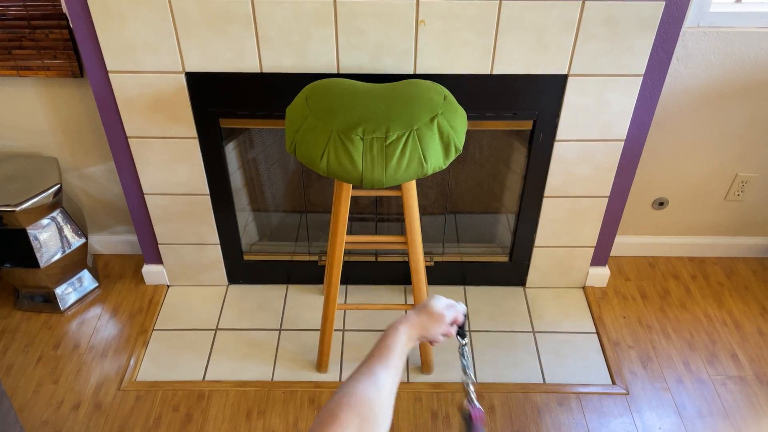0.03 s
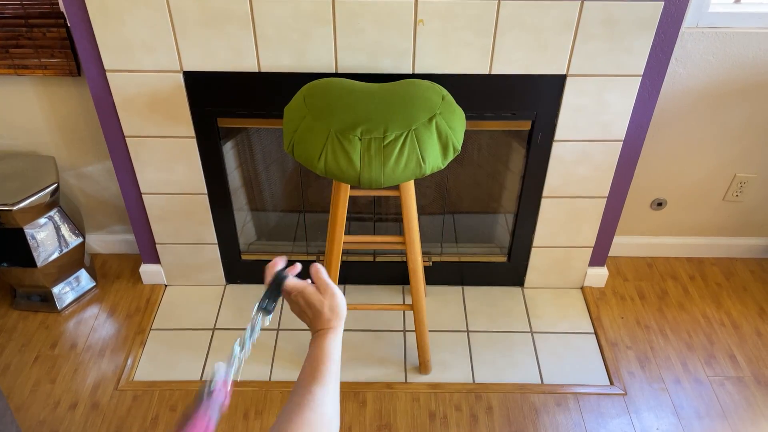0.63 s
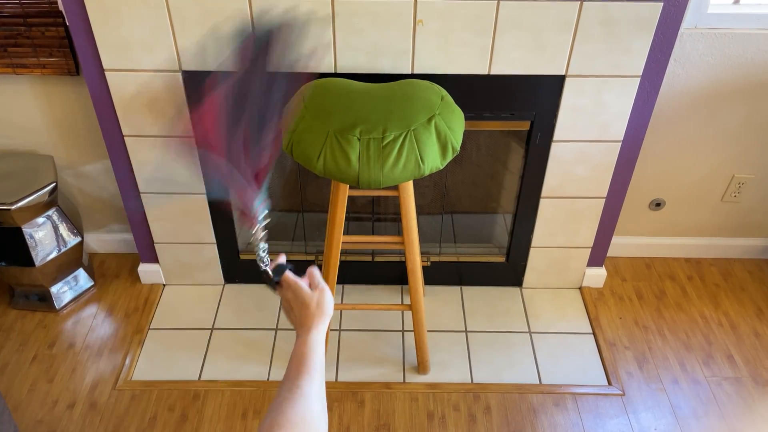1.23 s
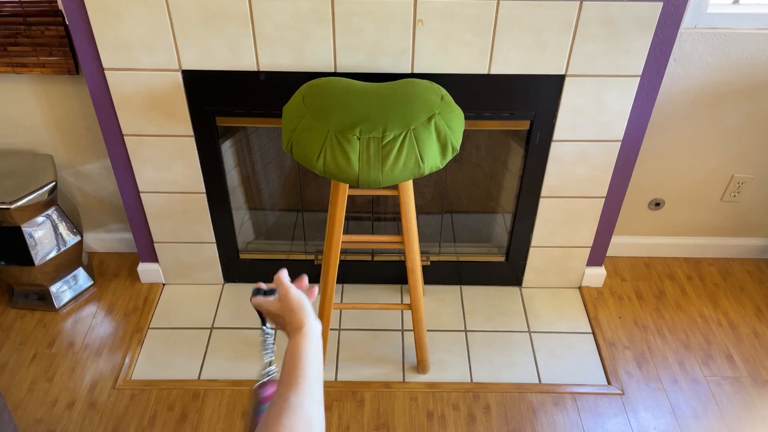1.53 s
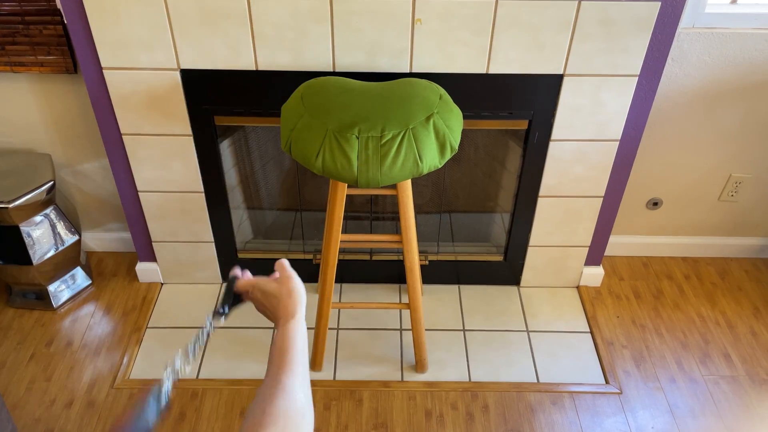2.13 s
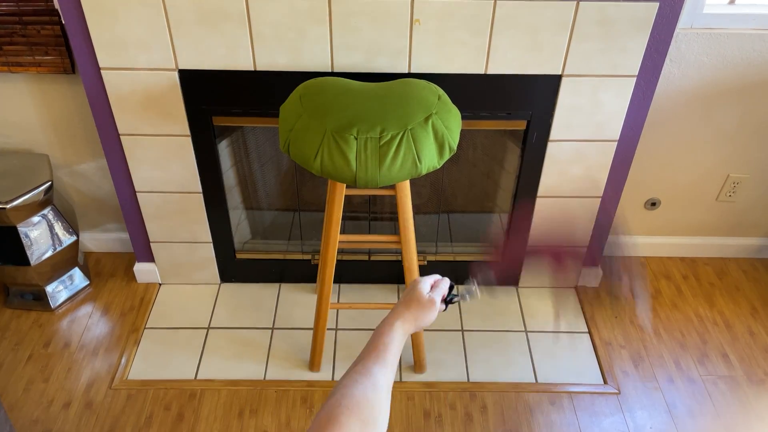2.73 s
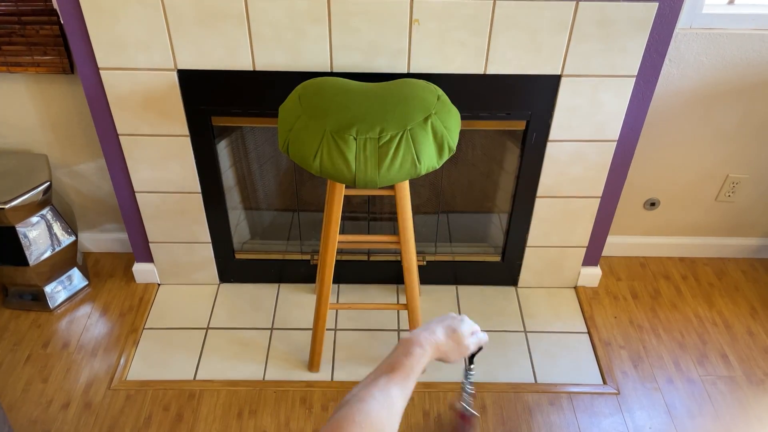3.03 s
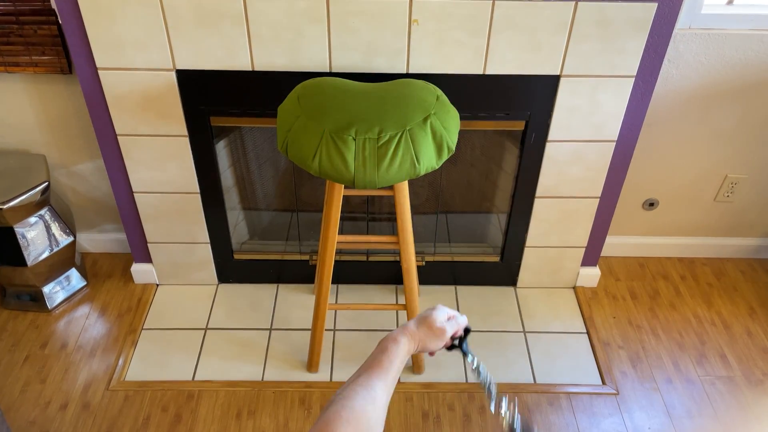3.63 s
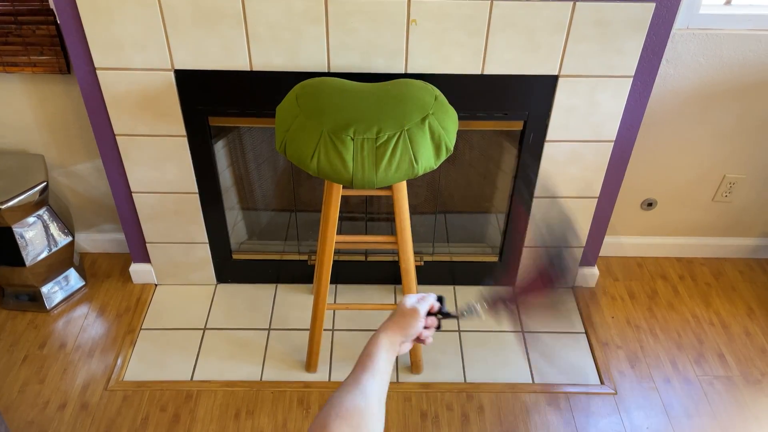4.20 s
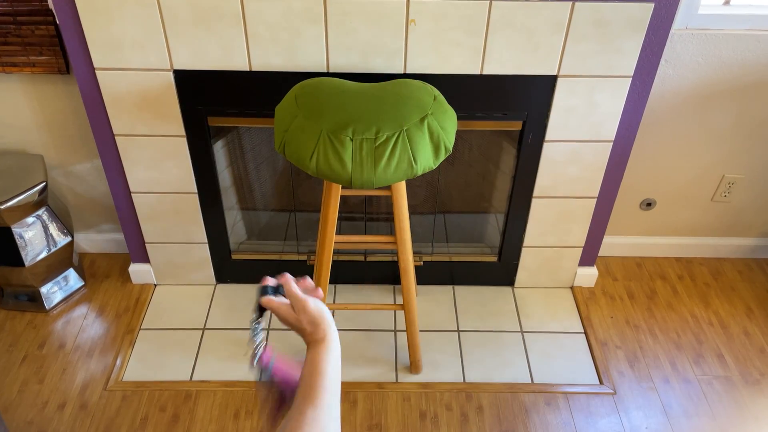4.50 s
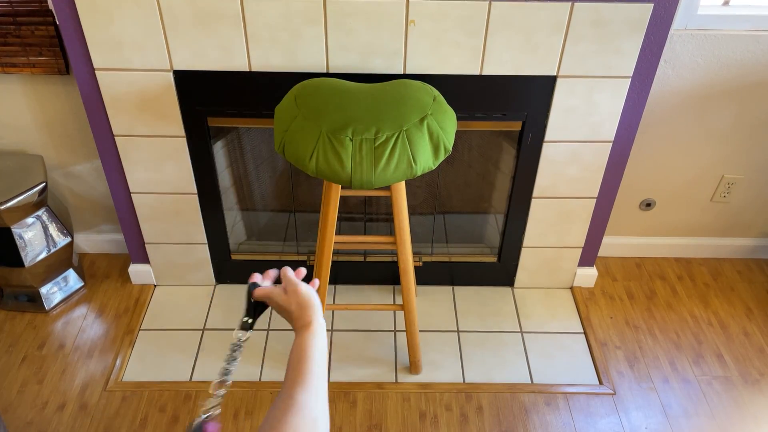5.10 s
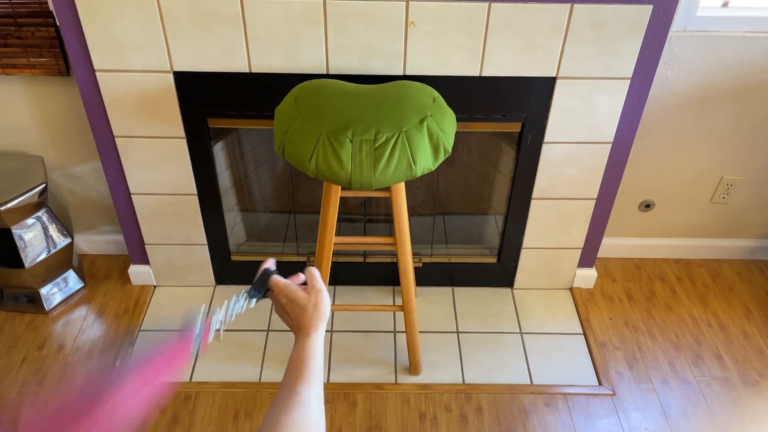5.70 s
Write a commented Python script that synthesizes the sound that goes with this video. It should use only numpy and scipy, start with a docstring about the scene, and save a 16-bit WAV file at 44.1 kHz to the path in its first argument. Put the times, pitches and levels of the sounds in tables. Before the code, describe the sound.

A many-tailed leather flogger strikes a padded stool about twice a second in a live, tiled room. Each stroke is a splashy slap with a soft cushion thud, some topped by a sharp crack from a single tip. Between strokes the loose tails flop and tick together, and the handle's metal link occasionally gives a small clink close to the microphone. A quiet low rumble lies behind.

```python
"""A live tiled room, heard through two closely spaced microphone ports. A many-tailed leather flogger
swings in figures of eight onto a padded stool, twice a second. Each stroke is a shower of tails with a
thud of the cushion, and single tips snap. Between strokes the tails flop together, and now and then the
handle's metal link clinks close to the microphone. A low rumble lies behind, with a faint hum late on."""
import sys
import numpy as np
from scipy import signal
from scipy.fft import rfft, irfft, next_fast_len
from scipy.io import wavfile
from scipy.ndimage import map_coordinates

SR = 44100
rng = np.random.default_rng(int(sys.argv[2]) if len(sys.argv) > 2 else 0)


def store_wav(level_fs):
    """Save 16-bit WAV to argv[1]."""
    pcm = np.round(np.clip(np.atleast_2d(level_fs), -1, 1) * 32767)
    wavfile.write(sys.argv[1], SR, pcm.T.astype(np.int16))


N = 262395
SPAN = 8192  # samples in one short sound, and in a track's run-up before time zero

# strokes on the seat: thickest_landing_s, lead_in_s, slap_db, pitch_factor, weight_db, air_pop_db
SEAT_STROKES = [(-.06, .014, -33, 1.02, -36.5, -40), (.448, .013, -22.5, 1.3, -26.5, -39),
                (.951, 0.011, -30, 1.05, -32.5, -40), (1.452, .028, -28, 1.11, -36, -36.5),
                (1.973, 0.03, -36, 1.02, -42, -51), (2.487, .013, -25.5, 1.04, -31, -37),
                (2.974, 0.012, -34.5, 1.04, -43.5, -45), (3.453, 0.0054, -31.5, 1.08, -40, -44),
                (3.951, .002, -34.5, 0.96, -36, -28.5), (4.456, .018, -26.5, .92, -30.5, -35),
                (4.973, .013, -32, 1.03, -34, -30), (5.481, .021, -28.5, 0.99, -35, -48)]
# single tips cracking or tapping: start_s, level_db, sizzle_db
TIP_SNAPS = [(0.4481, -8.5, -24.5), (.689, -30, -42), (.801, -41.5, -49), (.917, -38, -60),
             (0.9486, -18.5, -48), (1.04, -30, -28), (1.109, -32.5, -52), (1.177, -44, -47),
             (1.458, -16.5, -15.5), (1.697, -34, -54), (1.722, -20, -52), (2.195, -42, -54),
             (2.4879, -12.5, -20.5), (2.6393, -27, -54), (2.742, -30, -35), (2.9704, -20.5, -43),
             (3.456, -24.5, -34), (3.9498, -30.5, -29.5), (4.4536, -16.5, -21), (4.7092, -38, -65),
             (4.87, -39, -50), (5.2037, -32.5, -64)]
# loose tails flopping together: peak_s, fall_s, level_db, pitch_factor
TAIL_FLOPS = [(0.145, 0.098, -52.5, 0.78), (0.264, 0.077, -56, 0.74), (.695, .07, -48, 0.95),
              (1.118, .06, -47.5, 1.2), (1.181, 0.057, -42.5, 1.07), (1.727, 0.086, -39.5, 0.82),
              (1.925, 0.066, -49, 0.9), (2.022, .11, -40, 0.65), (2.203, 0.077, -48, 1.13),
              (2.469, 0.059, -45.5, 0.9), (2.63, .2, -42, 1.24), (2.747, 0.091, -38.5, 0.96),
              (3.158, 0.067, -40.5, 0.9), (3.228, 0.087, -45, 1.07), (3.549, 0.055, -42.5, 0.87),
              (4.141, 0.054, -52.5, .84), (4.24, 0.032, -57, 0.96), (4.353, 0.041, -58, 0.55),
              (5.21, 0.078, -45, 0.9), (5.725, 0.15, -49.5, 1)]
# clinks of the handle's link: start_s, pitch_hz, level_db, swell_s, t60_s, waver_fraction
LINK_CLINKS = [(0.42, 4050, -53.5, 0.0023, 0.14, .03), (3.22, 3910, -43, 0.0069, 0.24, 0.03),
               (5.845, 2182, -40.5, 0.0096, 0.16, 0.0083)]
# the link's partials: pitch_multiple, level_db
LINK_PARTIALS = [(1, 9), (.93, -2), (1.98, -10), (2.95, -17)]
# the padded seat as a whole: pitch_hz, width_hz, level_db
CUSHION_MODES = [(98.4, 40, -31), (206.4, 44, 23)]
# the seat's taut cover: pitch_hz, width_hz, level_db
COVER_MODES = [(301, 17, -10), (391, 67, 4), (604, 130, -11.5)]
# air squeezed from under the tails: pitch_hz, width_hz, level_db
AIR_POCKET_MODES = [(570, 34, 0.5), (937, 133, -4), (1252, 93, -3)]
# one leather contact: frequency_hz, level_db
LEATHER_SPECTRUM = [(40, -35.5), (200, -2.5), (700, -4.5), (1400, -5.5), (1900, 3), (2600, 3.5), (3900, 1),
                    (5000, -3), (6000, -16.5), (7500, -10), (10000, -21.5), (16000, -42)]
# the treble sizzle of a contact: frequency_hz, level_db
SIZZLE_SPECTRUM = [(500, -30), (4000, -12), (7000, 0), (8800, -5), (10500, -2), (12500, -6), (15000, -6),
                   (17000, -10)]
# colour of the echoes: frequency_hz, gain_db
WALL_COLOUR = [(60, 9), (110, 11.5), (200, -4), (400, -4), (800, -4.5), (1800, 1), (3000, -2), (5000, -2.5),
               (7500, -5), (16000, -7.5)]
# how long the room rings: frequency_hz, t60_s
ROOM_DECAY = [(100, 0.57), (400, 0.44), (1000, 0.72), (2500, 0.63), (5000, 0.66), (10000, 0.63),
              (16000, 0.35)]
# room tone: frequency_hz, level_db
RUMBLE_SPECTRUM = [(20, -36), (35, -7.5), (55, 1.5), (110, 1.5), (170, -6), (380, -6.5), (600, -16.5),
                   (1200, -13.5), (2800, -30.5), (5000, -24.5), (8000, -31), (11000, -35), (16000, -70)]
# course of the faint hum: time_s, pitch_hz, level_db
HUM_COURSE = [(0, 365, -85), (5.22, 350, -63), (5.32, 358, -58.5), (5.45, 362, -55.5), (5.68, 368, -60),
              (5.78, 366, -55), (5.95, 352, -58)]
# likeness of scattered sound at the two ports: frequency_hz, coherence (0-1)
PORT_COHERENCE = [(100, .97), (450, .85), (1300, .1), (3000, .2), (5300, .2), (7000, .6), (8600, .97),
                  (10500, .85), (11600, .5), (12700, .97), (16000, .75)]
# the ports' phase mismatch: frequency_hz, left_lead_rad
PORT_PHASE = [(900, 0.37), (2200, 1.44), (3800, 0.46), (5600, 2), (7000, 0.62), (8600, 3), (10400, 7.5),
              (12700, 9), (14500, 8), (16000, 26)]
# balance of sound from the front: frequency_hz, left_minus_right_db
FRONT_BALANCE = [(100, -0.5), (900, -4), (1350, -1), (1800, -3.5), (2600, 7), (3600, 2.5), (5200, 10),
                 (6100, -9), (8000, -0.5), (16000, 0)]


def strokes(whoosh_s=0.00486, sink_s=0.013, yield_s=0.00317, usual_slap_db=-28.5, usual_weight_db=-36.5):
    """The bundle pushes air ahead of it, slaps the cover, sinks into the padding and slides off."""
    track = np.zeros(N + SPAN)
    sizzle, pocket = minimum_phase(SIZZLE_SPECTRUM), resonant(AIR_POCKET_MODES)
    cover, cushion = resonant(COVER_MODES), resonant(CUSHION_MODES)
    for peak_s, lead_s, slap_db, pitch, weight_db, pop_db in SEAT_STROKES:
        touch_s = peak_s - lead_s
        fall_s = 0.049 + 0.76 * lead_s  # a spread-out bundle both arrives and settles more slowly
        sizzle_db = -38 + 0.8 * (slap_db - usual_slap_db)
        air_db = -36.5 + 0.34 * (weight_db - usual_weight_db)
        leather = minimum_phase(LEATHER_SPECTRUM, pitch)
        shape = landing(lead_s, fall_s, first_db=-12)
        whoosh = shower(landing(whoosh_s, fall_s, first_db=-3), pocket)
        add(track, touch_s - whoosh_s, amp(air_db - 13.5) * whoosh)
        add(track, touch_s, amp(slap_db) * shower(shape, leather, per_s=5000, scatter_db=2.5))
        add(track, touch_s, amp(sizzle_db) * shower(shape, sizzle))
        # trapped air pops at the first contact and is squeezed out as the rest lands
        add(track, touch_s, amp(pop_db) * blow(pocket, energy_s=0.0014))
        add(track, touch_s, amp(air_db) * shower(landing(lead_s, 0.61 * fall_s, first_db=-5.5), pocket))
        # single tails drum on the cover, the whole bundle knocks it, then the padding gives way
        add(track, touch_s, amp(weight_db - 2) * shower(shape, cover))
        loaded_s = max(peak_s, touch_s + sink_s)
        add(track, loaded_s, amp(weight_db + 0.5) * blow(cover, energy_s=0.0022))
        add(track, loaded_s + yield_s, amp(weight_db - 2) * blow(cushion, energy_s=0.0055))
        slide = shower(landing(lead_s=0.052, fall_s=0.15, first_db=-13), leather, per_s=450, scatter_db=1)
        add(track, peak_s, amp(-48) * slide)
    return track


def snaps(decay_s=0.00066):
    """Single tips crack or tap: a very short, dense burst of leather and sizzle."""
    track = np.zeros(N + SPAN)
    shape = np.exp(-np.arange(SPAN) / SR / decay_s)
    leather, sizzle = minimum_phase(LEATHER_SPECTRUM), minimum_phase(SIZZLE_SPECTRUM)
    for start_s, level_db, sizzle_db in TIP_SNAPS:
        add(track, start_s, amp(level_db) * shower(shape, leather, per_s=20000, scatter_db=4))
        add(track, start_s, amp(sizzle_db) * shower(shape, sizzle, per_s=20000, scatter_db=4))
    return track


def flops(lead_share=0.18):
    """Loose tails fall against each other in a soft, thin shower."""
    track, sizzle = np.zeros(N + SPAN), minimum_phase(SIZZLE_SPECTRUM)
    for peak_s, fall_s, level_db, pitch in TAIL_FLOPS:
        lead_s = lead_share * fall_s
        shape = landing(lead_s, fall_s, first_db=-7)
        leather = minimum_phase(LEATHER_SPECTRUM, pitch)
        add(track, peak_s - lead_s, amp(level_db) * shower(shape, leather, per_s=1200))
        add(track, peak_s - lead_s, amp(level_db - 14) * shower(shape, sizzle, per_s=700))
    return track


def strays(count=3, first_s=0.16, last_s=0.36, decay_s=0.0017):
    """After each stroke a few stray tails tap each other as the bundle swings round."""
    track = np.zeros(N + SPAN)
    shape = np.exp(-np.arange(SPAN) / SR / decay_s)
    leather, sizzle = minimum_phase(LEATHER_SPECTRUM), minimum_phase(SIZZLE_SPECTRUM)
    for peak_s, *_ in SEAT_STROKES:
        for when, size, brightness in rng.random((count, 3)):
            tap = amp(-55 + 6 * size) * shower(shape, leather)
            tick = amp(-64.5 + 6 * brightness) * shower(shape, sizzle)
            add(track, peak_s + first_s + when * (last_s - first_s), tap + tick)
    return track


def rustle(per_s=170, level_db=-66, patchy_db=5):
    """The swinging tails brush faintly against each other, in clumps."""
    size = N + SPAN
    ticks = (rng.random(size) < per_s / SR) * (2 * rng.random(size) - 1)
    clumps = amp(patchy_db * np.tanh(wobble(22, size)))
    contact = irfft(minimum_phase(LEATHER_SPECTRUM))
    return amp(level_db) * unit(signal.fftconvolve(ticks * clumps, contact)[:size])


def link():
    """The handle's metal link rubs and rings with an unsteady pitch."""
    track, t = np.zeros(N + SPAN), np.arange(SR // 2) / SR
    for start_s, pitch_hz, level_db, swell_s, t60_s, waver in LINK_CLINKS:
        phase = 2 * np.pi * np.cumsum(pitch_hz * (1 + waver * wobble(400, len(t)))) / SR
        ring = sum(amp(db) * np.sin(multiple * phase) for multiple, db in LINK_PARTIALS)
        envelope = amp(-60 * t / t60_s) * (1 - np.exp(-t / swell_s))
        add(track, start_s, amp(level_db) * ring * envelope)
    return track


def echoes(near_t60_s=0.12, early_t60_s=0.17, wall_s=0.02):
    """Hearth tiles answer at once, the walls a little later, then the whole room rings."""
    hz, frame_s, noise = signal.stft(rng.standard_normal((2, SR)), SR, nperseg=256)
    decay = amp(-60 * frame_s / along(ROOM_DECAY, hz)[:, None])
    late = signal.istft(noise * decay, SR, nperseg=256)[1][:, :SR]
    t = np.arange(SR) / SR
    arrival = 1 / (1 + np.exp((wall_s - t) / 0.0061))
    near = rng.standard_normal((2, SR)) * amp(-60 * t / near_t60_s) * (t > .001)
    early = rng.standard_normal((2, SR)) * amp(-60 * t / early_t60_s)
    answer = amp(-7) * unit(near) + amp(-7) * unit(early * arrival) + amp(-4) * unit(late * arrival)
    return at_ports(filtered(answer, lambda f: amp(along(WALL_COLOUR, f)))) / np.sqrt(SR)


def room(x, spots=4, low_cut_hz=110):
    """Tails land all over the seat, and each spot wakes its own set of echoes; deep bass dies at once."""
    shares = np.exp([wobble(90, len(x)) for _ in range(spots)]) ** 2
    shares /= np.linalg.norm(shares, axis=0)
    wet = sum(signal.fftconvolve((x * share)[None], echoes(), axes=1)[:, :len(x)] for share in shares)
    return filtered(wet, lambda hz: hz ** 2 / np.hypot(hz ** 2, low_cut_hz ** 2))


def rumble(level_db=-58):
    """Low room tone reaches the microphone from all round."""
    noise = at_ports(rng.standard_normal((2, N)))
    return amp(level_db) * unit(filtered(noise, lambda hz: amp(along(RUMBLE_SPECTRUM, hz))))


def hum(pitch_waver=0.03, waver_db=3):
    """A faint wavering tone comes up near the end, dead centre."""
    time_s, pitch_hz, level_db = np.transpose(HUM_COURSE)
    t = np.arange(N) / SR
    wavering_hz = np.interp(t, time_s, pitch_hz) * (1 + pitch_waver * wobble(50, N))
    gain = amp(np.interp(t, time_s, level_db) + waver_db * wobble(23, N))
    return gain * np.sin(2 * np.pi * np.cumsum(wavering_hz) / SR)


def at_ports(pair):
    """Two unrelated signals become as alike as scattered sound at two closely spaced ports."""
    def mid_side_gains(hz):
        angle = np.arccos(along(PORT_COHERENCE, hz)) / 2
        return np.array([np.cos(angle), np.sin(angle)])
    mid, side = filtered(pair, mid_side_gains)
    return np.array([mid + side, mid - side])


def from_front(x, bias):
    """Sound from the front favours one port or the other by band; bias scales the imbalance."""
    return filtered(x, lambda hz: amp(np.outer([.5, -.5], bias * along(FRONT_BALANCE, hz))))


def landing(lead_s, fall_s, first_db):
    """Envelope of tails landing: it swells from first_db, then drops 40 dB in the fall time."""
    t = np.arange(SPAN) / SR
    level_db = np.where(t < lead_s, first_db * (1 - t / lead_s), -40 * (t - lead_s) / fall_s)
    return amp(level_db) * np.minimum(1, t / .002)


def shower(shape, body, per_s=4500, scatter_db=3):
    """Contacts of random size excite a body, with the energy that the shape gives."""
    hits = rng.random(SPAN) < per_s / SR
    sizes = amp(scatter_db * np.clip(rng.standard_normal(SPAN), -2, 2))
    contacts = hits * sizes * np.sign(rng.standard_normal(SPAN))
    return unit(irfft(rfft(contacts * shape) * body)) * np.sqrt(np.mean(shape ** 2))


def blow(body, energy_s):
    """One push rings a body, with the energy of an rms-1 sound lasting energy_s."""
    return unit(irfft(body)) * np.sqrt(energy_s * SR / SPAN)


def resonant(modes):
    """Response of a few damped resonances of alternating sign."""
    f = np.fft.rfftfreq(SPAN, 1 / SR)
    return sum((-1) ** k * amp(db) * 1j * f * width / (hz * hz - f * f + 1j * f * width)
               for k, (hz, width, db) in enumerate(modes))


def minimum_phase(spectrum, pitch=1):
    """Causal response with the given spectrum, shifted by a pitch factor."""
    hz = np.fft.rfftfreq(SPAN, 1 / SR)
    cepstrum = irfft(np.log(amp(along(spectrum, hz / pitch))))
    fold = np.r_[1, np.full(SPAN // 2 - 1, 2), np.zeros(SPAN // 2)]
    return np.exp(rfft(cepstrum * fold))


def filtered(x, response):
    """Pass x through a complex response of frequency."""
    size = x.shape[-1]
    padded = next_fast_len(size + SPAN)
    return irfft(rfft(x, padded) * response(np.fft.rfftfreq(padded, 1 / SR)), padded)[..., :size]


def along(points, hz):
    """Read (frequency_hz, value) points on a log axis."""
    point_hz, values = np.transpose(points)
    return np.interp(np.log(hz + 1), np.log(point_hz + 1), values)


def wobble(per_s, size):
    """A smooth random curve with per_s knots a second."""
    knots = rng.standard_normal(int(size * per_s / SR) + 4)
    return map_coordinates(knots, [np.arange(size) * per_s / SR])


def add(track, start_s, sound):
    """Mix a sound in; the track begins SPAN samples before time zero."""
    part = track[max(0, round(start_s * SR) + SPAN):][:len(sound)]
    part += sound[:len(part)]


def amp(db):
    """Decibels to gain."""
    return 10 ** (np.asarray(db) / 20)


def unit(x):
    """Scale to rms 1."""
    return x / np.sqrt(np.mean(x ** 2) + 1e-20)


def scene():
    """The flogger in front of the microphone, its echoes more evenly spread, room tone behind."""
    leather = strokes() + snaps() + flops() + strays() + rustle()
    handle = link()
    wet = room(leather + amp(-7) * handle)  # the handle is close to the microphone, so it sounds drier
    heard = amp(-1) * (from_front(leather + handle, bias=1) + from_front(wet, bias=0.45))
    return heard[:, SPAN:] + rumble() + hum()


def record(dry):
    """The two ports differ in phase, the highest peaks are rounded, and the extreme treble is cut."""
    ceiling, top_hz, edge_hz = 0.6, 16150, 700
    pair = filtered(dry, lambda hz: np.exp(1j * np.outer([.5, -.5], along(PORT_PHASE, hz))))
    rounded = pair / (1 + (pair / ceiling) ** 4) ** .25
    return filtered(rounded, lambda hz: np.clip((top_hz - hz) / edge_hz + .5, 0, 1))


dry = scene()
out = record(dry)
store_wav(out)
```